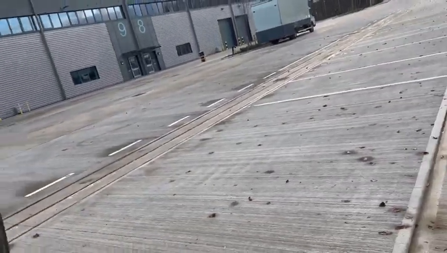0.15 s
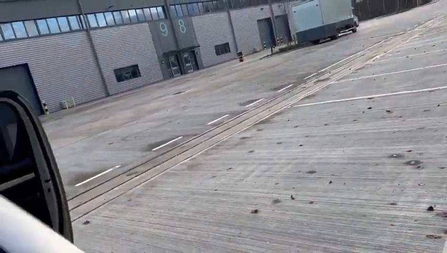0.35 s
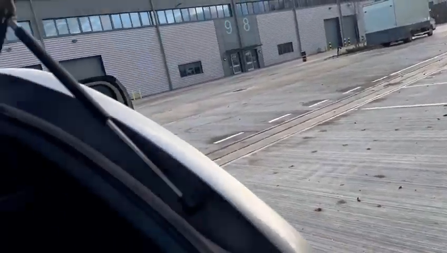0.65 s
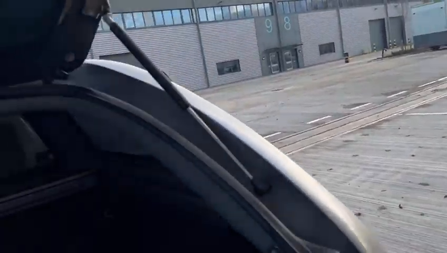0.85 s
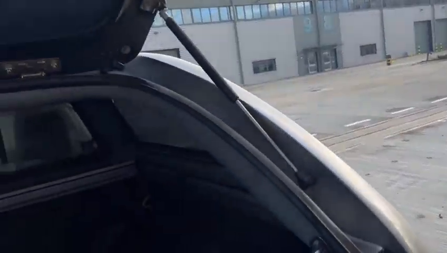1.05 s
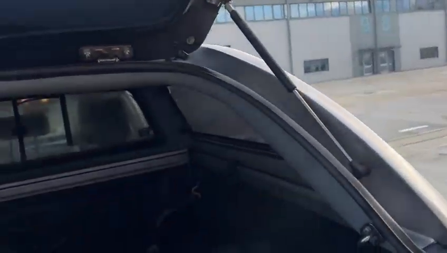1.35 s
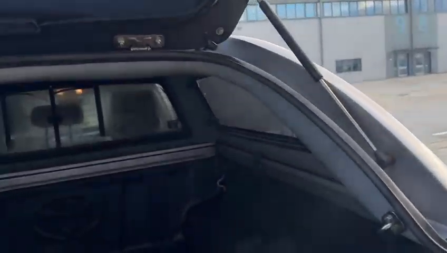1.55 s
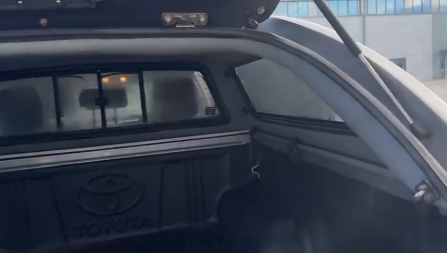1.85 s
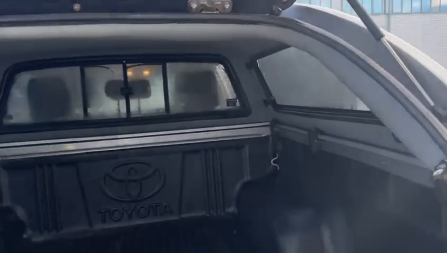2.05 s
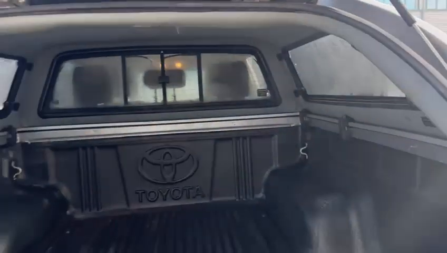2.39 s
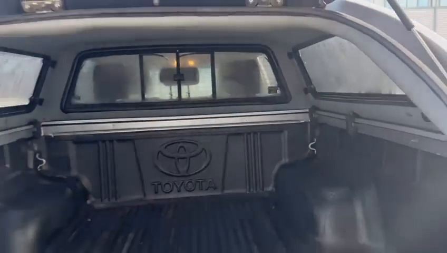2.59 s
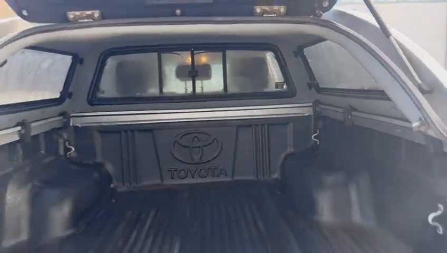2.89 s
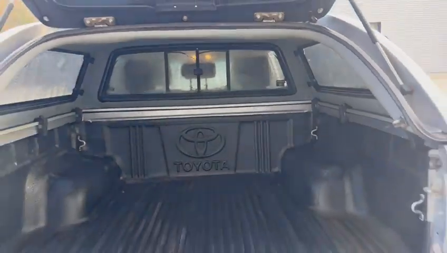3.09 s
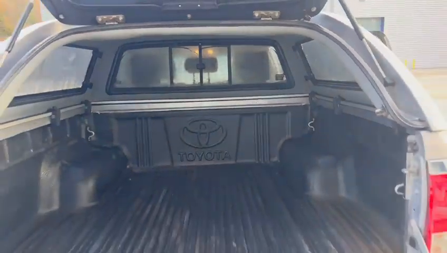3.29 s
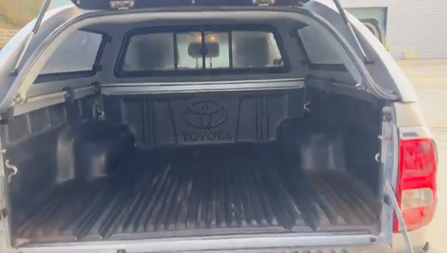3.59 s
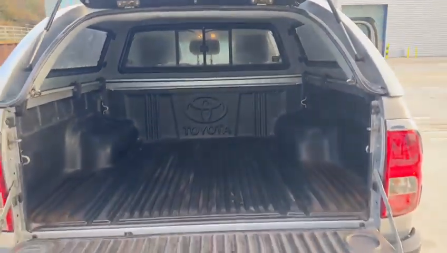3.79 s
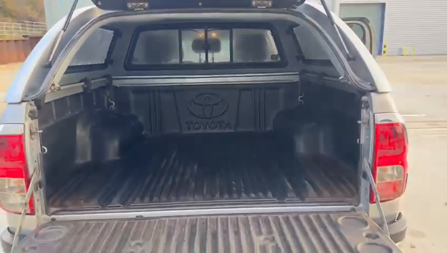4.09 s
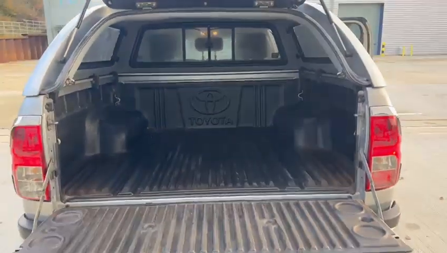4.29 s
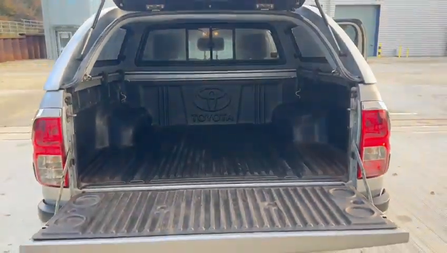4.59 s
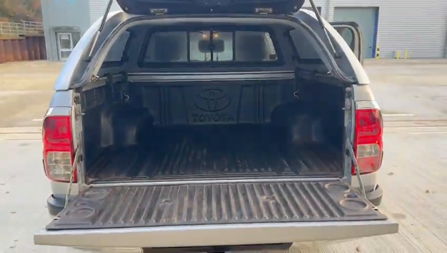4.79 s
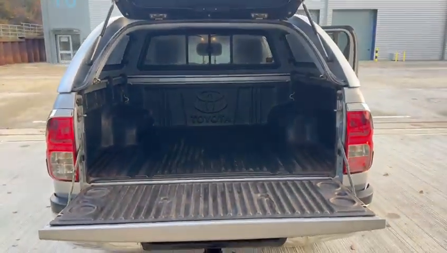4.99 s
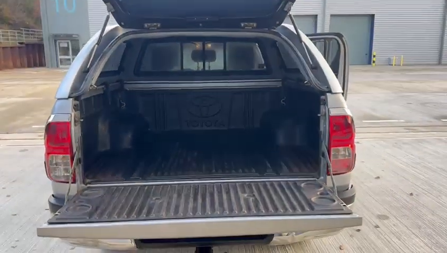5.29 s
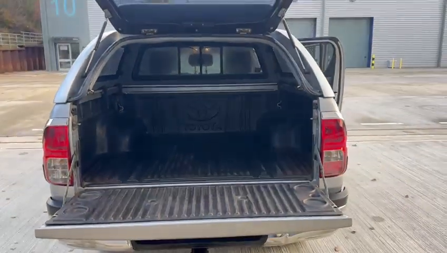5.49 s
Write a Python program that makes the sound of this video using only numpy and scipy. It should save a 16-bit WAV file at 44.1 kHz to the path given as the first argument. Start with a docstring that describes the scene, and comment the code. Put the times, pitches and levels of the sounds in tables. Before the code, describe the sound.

Over a low diesel idle, a latch snaps open, a hollow metal tailgate drops and bangs hard, rattling, followed by small foot scuffs.

```python
"""A pickup truck's tailgate is opened in a concrete yard; an idling diesel hums and clatters throughout (sines, noise).
Soft bumps (dull noise) come first; the handle clicks and the steel latch springs free (cracks, noise, sines).
The gate knocks, fittings tremble as it swings down, then it slams and rebounds: crack, dense ring, panel modes.
The bed booms (low sines) and shudders (noise), the stays snap taut, fittings tick (short noise rings).
Shoes scuff grit (noise swells), and one last bump follows. Two microphone ports hear it from close by."""
import sys
import numpy as np
from scipy import signal
from scipy.fft import rfft, irfft, next_fast_len
from scipy.io import wavfile

SR = 44100
rng = np.random.default_rng(int(sys.argv[2]) if len(sys.argv) > 2 else 0)


def master(y):
    """Save y as 16-bit WAV."""
    cut = np.clip(np.atleast_2d(y).T, -1, 1)
    pcm = np.round(cut * 32767)  # scale
    wavfile.write(sys.argv[1], SR, pcm.astype(np.int16))


N = 249184


def amp(db):
    """Decibels to gain."""
    return 10 ** (np.asarray(db) / 20)


def read(table, hz, axis=1):
    """One column of a table, interpolated on a log-frequency axis."""
    table = np.array(table, float)
    return np.interp(np.log(hz + 1), np.log(table[:, 0] + 1), table[:, axis])


def add(mix, start_s, sound):
    """Adds a sound to the mix at start_s, cut at the end of the mix."""
    part = mix[:, max(round(start_s * SR), 0):][:, :sound.shape[-1]]
    part += sound[..., :part.shape[1]]


def drift(rate_hz):
    """Random wander of unit rms: noise low-passed near rate_hz."""
    hz = np.fft.rfftfreq(N, 1 / SR)
    wander = irfft(rfft(rng.standard_normal(N)) * np.exp(-(hz / rate_hz) ** 2), N)
    return wander / wander.std()


def chatter(depth_db, rate_hz):
    """Loose contacts buzz: a gain that makes small irregular bursts."""
    return amp(depth_db * (drift(rate_hz) + 0.66))


def uneven_response(depth_db, count=260):
    """Random peaks and valleys of one object, shared by all its blows: rows (pitch_hz, level_db)."""
    hz = np.geomspace(800, 13000, count) - 750
    peaks = np.clip(rng.standard_normal(count), -2, 2) - .5
    return np.column_stack([hz, depth_db * peaks])


# microphone ports: pitch_hz, likeness (0-1), left_lead_rad, left_over_right_db
PORTS = [(60, 1, 0, .1), (200, .98, .06, .8), (450, .89, .27, 2.2), (800, .76, .65, 3.3),
         (1250, .66, 2, 1.2), (1800, .45, 5.5, -1.2), (2600, .55, 6.6, 0), (4000, .42, 6.6, 1),
         (6000, .74, 6.3, .8), (8500, .7, 5.9, -.8), (9200, .7, 5.9, -.5), (10300, .45, 3.4, -.3)]


def noise_pair(size):
    """Spectra of white noise at 0 dB per Hz, partly alike at the two ports."""
    hz = np.fft.rfftfreq(size, 1 / SR)
    a, b = rfft(rng.standard_normal((2, size))) * np.sqrt(SR / 2)
    alike = np.clip(read(PORTS, hz), 0, 1)
    common = a * np.sqrt((1 + alike) / 2)
    apart = b * np.sqrt((1 - alike) / 2)
    return hz, np.array([common + apart, common - apart])


def through_ports(near):
    """Near sounds reach the two ports with their own phase and balance."""
    size = next_fast_len(N + 8192)
    hz = np.fft.rfftfreq(size, 1 / SR)
    balance = amp(read(PORTS, hz, axis=3) / 2)
    right_lag = np.exp(-1j * read(PORTS, hz, axis=2))
    response = np.array([balance, right_lag / balance])
    return irfft(rfft(near, size) * response, size)[:, :N]


def dense_ring(table, colour_db, crack_db, crack_s, stretch, size=32768, count=12):
    """Countless close modes as noise bands, each dying at its own speed, topped by the contact crack."""
    hz, spectrum = noise_pair(size)
    t = np.arange(size) / SR
    spectrum = spectrum * amp(read(table, hz) + colour_db(np.maximum(hz, 60)))
    centres_hz = np.geomspace(40, 12000, count)
    out = np.zeros((2, size))
    for centre_hz, share in zip(centres_hz, np.eye(count)):
        weight = np.interp(np.log(hz + 1), np.log(centres_hz), share)
        band = irfft(spectrum * weight, size)
        t60_s = read(table, centre_hz, axis=2) * stretch
        ring = np.exp(-np.log(1000) * t / t60_s)
        crack = amp(crack_db) * np.exp(-t / crack_s) * centre_hz / (centre_hz + 600)
        rise = 1 - np.exp(-t / (0.00034 + 1 / centre_hz))  # bass needs a cycle to build
        out += band * (ring + crack) * rise
    return out


def modes(table, rise_s, scatter_db, size=65536):
    """Damped sines; every blow lands elsewhere and weights them a little differently."""
    t = np.arange(size) / SR
    out = np.zeros(size)
    for pitch_hz, level_db, t60_s in table:
        gain = amp(level_db + scatter_db * rng.standard_normal())
        out += gain * np.exp(-np.log(1000) * t / t60_s) * np.sin(2 * np.pi * pitch_hz * t)
    return out * (1 - np.exp(-t / rise_s))


# ring time factor of a full contact; crack that halves it; width of that change
FULL_RING, HALVING_CRACK_DB, HALVING_WIDTH_DB = 1.004, 15, 6.5


def ring_time(crack_db):
    """Ring time factor: a glancing, cracking contact rings briefly."""
    return FULL_RING / (1 + np.exp((crack_db - HALVING_CRACK_DB) / HALVING_WIDTH_DB))


# hum and whine of the idling engine: order (multiple of FIRING_HZ), level_db (rms, before swells)
ORDERS = [(2, -40.5), (3, -51.5), (4, -48), (5, -54.5), (6, -58), (9, -63.5), (27.5, -61.5), (37, -69.5),
          (38, -67.5), (45, -66.5), (51, -74), (52, -77), (54, -72)]
# engine clatter and open air: pitch_hz, density_db_per_hz
AIR = [(20, -78), (55, -65.5), (140, -74.5), (250, -77.5), (430, -83), (600, -79.5), (820, -84.5),
       (1250, -81.5), (1650, -90.5), (2500, -94.5), (4000, -96), (6300, -103.5), (8300, -103.5),
       (11500, -108)]
# level of the clatter and air noise, swelling with the slam's dying tail: time_s, level_db
NOISE_LEVEL = [(0, .5), (1.9, -0.2), (2.65, 2.5), (3.1, -1.3), (4.3, 0.9)]
FIRING_HZ = 25.08  # mean
# the hum swells while the microphones are beside the open bed
BED_FROM_S, BED_UNTIL_S, BED_CROSS_S = 1, 2.82, 0.12
HUM_DB, BED_EXTRA_DB = -1.36, 4.5


def engine():
    """Hum on the firing orders, belt and gear whine, and clatter and air noise pulsing at each firing."""
    t = np.arange(N) / SR
    arrive = np.tanh((t - BED_FROM_S) / BED_CROSS_S)
    leave = np.tanh((t - BED_UNTIL_S) / BED_CROSS_S)
    hum_db = HUM_DB + BED_EXTRA_DB * (arrive - leave) / 2
    noise_db = np.interp(t, *np.transpose(NOISE_LEVEL))
    firings = np.cumsum(FIRING_HZ * (1 + 0.003035 * drift(2.62))) / SR
    out = np.zeros((2, N))
    for order, level_db in ORDERS:
        wave = np.sqrt(2) * np.sin(2 * np.pi * (order * firings + rng.random()))
        if order < 10:
            out += wave * amp(level_db + hum_db + 0.55 * drift(5.3))
        else:  # the whine of the belts and gears comes and goes
            out += wave * amp(level_db + 2.7 * noise_db - 2.0 + 3.1 * drift(2.7))
    hz, spectrum = noise_pair(size=N)
    pulsing_db = 1.03 * np.cos(2 * np.pi * firings) + 0.4 * drift(22.8)
    return out + irfft(spectrum * amp(read(AIR, hz)), N) * amp(noise_db + pulsing_db)


# scuffs of shoes: centre_s, level_db, half_length_s (to 1/e), low_grind_db
SCUFFS = [(2.13, -48.5, 0.16, 17), (2.882, -53, 0.038, 17.5), (3.18, -44, 0.043, 1),
          (3.405, -48.5, .025, 1), (3.992, -50.5, 0.028, 9), (4.258, -47, 0.027, 12.5)]
# spectrum of grit and light metal: pitch_hz, density_db_per_hz, t60_s (metal only, before stretch)
TICK_RING = [(203, -47.5, 0.13), (1164, -45, 0.38), (2860, -50.5, 0.2), (5500, -52.5, 0.3),
             (8450, -48, 0.08), (12200, -45.5, 0.27)]


def scuffs():
    """Shoes grind grit on the concrete: buzzing noise that swells and fades."""
    t, out = np.arange(N) / SR, np.zeros((2, N))
    hz, spectrum = noise_pair(size=N)
    for centre_s, level_db, half_length_s, low_db in SCUFFS:
        grit = irfft(spectrum * amp(read(TICK_RING, hz) + low_db * np.exp(-hz / 4400)), N)
        out += grit * amp(level_db) * np.exp(-((t - centre_s) / half_length_s) ** 2)
    return out * chatter(depth_db=1, rate_hz=340)


# soft bumps of feet and hands: start_s, level_db, pitch_hz, length_s (twice the time to the peak)
BUMPS = [(.008, -28, 191, 0.02), (.355, -41.5, 330, .035), (.405, -35.5, 138, 0.04), (.52, -37, 121, 0.035),
         (.78, -37, 158, 0.073), (0.823, -33, 277, 0.009), (5.53, -34, 67, 0.017)]


def bumps():
    """Soft, dull pushes with no ring: low-passed noise under a smooth pulse."""
    out = np.zeros((2, N))
    for start_s, level_db, pitch_hz, length_s in BUMPS:
        hz, spectrum = noise_pair(size=16384)
        thud = irfft(spectrum / (1 + (1.8 * np.log2((hz + 1) / pitch_hz)) ** 4))
        u = 2 * np.arange(thud.shape[1]) / SR / length_s
        push = u * np.exp(1 - u)
        rms = np.sqrt(np.sum((thud[0] * push) ** 2) / np.sum(push ** 2))
        add(out, start_s, amp(level_db) * thud * push / rms)
    return out


def tick(level_db, low_db):
    """One light metal part touches another: a crack and a short dense ring."""
    colour_db = lambda hz: low_db * np.exp(-hz / 4400)
    return amp(level_db) * dense_ring(TICK_RING, colour_db, 14.0, 0.0019, 0.95, size=16384)


# single ticks of the stays and fittings: start_s, level_db, low_ring_db
TICKS = [(.15, -52.5, 19), (2.332, -39, 0), (2.545, -43, 4), (2.55, -39.5, 0), (2.664, -39, -6),
         (2.704, -50, -1), (2.859, -57.5, 21), (2.911, -52.5, 17)]
# trembling while the gate swings down and after it lands: start_s, end_s, level_db
RATTLES = [(1.802, 2.139, -54), (2.329, 2.56, -48.5)]
RATTLE_COUNT, RATTLE_SPREAD_DB, RATTLE_LOW_DB = 6, 2, -5.5  # count per rattle; spread is +/-


def fittings():
    """A few clear ticks, and faint irregular ticks of loose fittings in two spells."""
    out = np.zeros((2, N))
    for start_s, level_db, low_db in TICKS:
        add(out, start_s, tick(level_db, low_db))
    for start_s, end_s, level_db in RATTLES:
        slot_s = (end_s - start_s) / RATTLE_COUNT
        for i in range(RATTLE_COUNT):
            late, strength = rng.random(2)
            tick_db = level_db + RATTLE_SPREAD_DB * (2 * strength - 1)
            add(out, start_s + (i + late) * slot_s, tick(tick_db, RATTLE_LOW_DB))
    return out * chatter(depth_db=4.0, rate_hz=220)


# jerks of the stays: start_s, level_db
STAY_BLOWS = [(1.4025, -8), (2.2845, 0.5), (2.2915, -4.5), (2.303, -4.5), (2.411, -15)]
# dense ringing of the stays: pitch_hz, density_db_per_hz, t60_s (before stretch)
STAY_RING = [(150, -63, .2), (450, -71, 0.15), (716, -56, 0.25), (1090, -56, 0.25), (1400, -54.5, 0.2),
             (2160, -60, 0.19), (3180, -67.5, 0.25), (5030, -83, 0.23), (11500, -90, 0.15)]


def stays():
    """Steel stays jerk as the gate comes free, and snap taut with a crunch when it comes down again."""
    out, response = np.zeros((2, N)), uneven_response(depth_db=4.0)
    colour_db = lambda hz: read(response, hz)
    for start_s, level_db in STAY_BLOWS:
        ring = dense_ring(STAY_RING, colour_db, 5.6, 0.0042, 0.89, size=16384)
        add(out, start_s, amp(level_db) * ring)
    return out * chatter(depth_db=-1.5, rate_hz=400)


# blows in the latch: start_s, level_db, brightness_db_per_octave, crack_db (over the ring)
LATCH_BLOWS = [(0.7215, -11.5, -3, 3.5), (0.8731, -11, -8, 15), (.8822, 0, 1, -10), (.8915, -3, 1.4, -4),
               (0.9053, -2.5, -1.5, 1), (.921, -9.5, -2.5, 4)]
# dense ringing of the latch: pitch_hz, density_db_per_hz, t60_s (of a full contact)
LATCH_RING = [(40, -67, 0.5), (84.5, -43.5, 0.85), (139, -45.5, 0.64), (323, -48, 0.26), (800, -53, 0.33),
              (1170, -49.5, 0.24), (1650, -56, 0.27), (2060, -56.5, 0.37), (4200, -63.5, 0.3),
              (6730, -64, 0.33), (9000, -59.5, 0.22), (11600, -61.5, 0.23)]
# modes of the steel catches: pitch_hz, level_db, t60_s
STEEL_MODES = [(137.4, -21, 0.27), (165, -7, 0.18), (475, -29.5, 0.22), (695, -16, 0.12), (1070, -31, 0.27),
               (1167, -24, 0.22), (1897, -32, 0.14), (2050, -31, 0.23), (2213, -30, 0.18),
               (2810, -53, 0.103), (2817, -30.5, 0.12), (3225, -37, 0.31), (5560, -35, 0.16),
               (7680, -33, 0.22), (8200, -36, 0.28)]
STEEL_GROWTH = 1.7  # dB per dB of blow: the catches ring out only when struck hard


def latch():
    """The handle takes up slack, then the sprung steel catches let go in a quick cluster."""
    out, response = np.zeros((2, N)), uneven_response(depth_db=3.5)
    for start_s, level_db, tilt_db, crack_db in LATCH_BLOWS:
        colour_db = lambda hz: tilt_db * np.log2(np.maximum(hz, 190) / 1000) + read(response, hz)
        ring = dense_ring(LATCH_RING, colour_db, crack_db, 0.0068, ring_time(crack_db))
        steel = modes(STEEL_MODES, rise_s=0.0011, scatter_db=3.2)
        add(out, start_s, amp(level_db) * ring)
        add(out, start_s, amp(STEEL_GROWTH * level_db) * steel)
    return out * chatter(depth_db=1.0, rate_hz=270)


# dense ringing of the gate: pitch_hz, density_db_per_hz, t60_s (of a full contact)
GATE_RING = [(30, -59, 0.62), (80, -39.5, 0.73), (184, -38.5, 0.31), (410, -41.5, 0.38), (694, -46, 0.11),
             (1230, -49, 0.33), (1586, -56.5, 0.19), (2100, -62.5, 0.4), (4350, -68, 0.41),
             (7900, -75.5, 0.3), (11500, -78.5, 0.41)]
# modes of the gate panel: pitch_hz, level_db, t60_s
PANEL_MODES = [(101.7, -20, 0.63), (121.3, -21.5, 0.59), (127.6, -15.5, 0.56), (164.6, -16.5, 0.3),
               (226.3, -24, 0.48), (278.8, -28.5, 0.44), (323.4, -22, 0.35), (398, -23, 0.12),
               (487, -21.5, 0.26), (590, -19, 0.12), (702, -21, 0.11), (779, -29, 0.21)]
PANEL_DB, PANEL_LOSS = 3, 0.32  # modes against the blow; dB lost per dB of crack


def gate_blow(response, level_db, tilt_db, crack_db):
    """One contact: a crack, the dense ring of the gate and its panel modes."""
    colour_db = lambda hz: tilt_db * np.log2(hz / 1000) + read(response, hz)
    ring = dense_ring(GATE_RING, colour_db, crack_db, 0.0042, 1.005 * ring_time(crack_db))
    panel = modes(PANEL_MODES, rise_s=0.0044, scatter_db=0.57, size=32768)
    return amp(level_db) * (ring + amp(PANEL_DB - PANEL_LOSS * crack_db) * panel)


# blows on the gate: start_s, level_db, brightness_db_per_octave, crack_db (over the ring)
GATE_BLOWS = [(1.3647, -23.5, 3.5, 7), (1.3781, -21.5, 4.5, 1), (1.4012, -6, 0.4, 14), (2.1594, 4, -.5, 9),
              (2.1918, -3.5, 1.5, 3.5), (2.293, -5.5, -3.5, 10.5), (2.44, -19, 1, -7),
              (2.549, -26.5, -2.5, 1)]
# heaves of the truck bed on its springs: start_s, level_db
HEAVES = [(0.963, -11.5), (2.167, 1.5), (2.209, -5), (2.3143, -2), (2.354, -6.5), (2.48, -9.5)]
# modes of the bed: pitch_hz, level_db, t60_s
BED_MODES = [(29, -36.5, 1), (47.4, -6.5, 0.41), (66.4, -28, 0.22)]
# dense ringing of the shuddering bed: pitch_hz, density_db_per_hz, t60_s
SHUDDER_RING = [(30, -50, 1.4), (109, -48.5, 1.6), (236, -52.5, 2.04), (510, -55, 1.46), (870, -55.5, 1.01),
                (1950, -69, 1), (4500, -92, 2.4), (8100, -78.5, 0.51), (11400, -83, 1.05)]
# after each blow the gate seats on its other hinge, softer, with one fixed dull tone
SEAT_DELAY_S, SEAT_SOFTER_DB, SEAT_TILT_DB_PER_OCTAVE, SEAT_CRACK_DB = 0.03, -9, -3, -3.5


def gate():
    """The hollow gate knocks, slams and rebounds, hinge after hinge; the bed booms and shudders."""
    out, response = np.zeros((2, N)), uneven_response(depth_db=2.5)
    for start_s, level_db, tilt_db, crack_db in GATE_BLOWS:
        add(out, start_s, gate_blow(response, level_db, tilt_db, crack_db))
        seating = gate_blow(response, level_db + SEAT_SOFTER_DB, SEAT_TILT_DB_PER_OCTAVE, SEAT_CRACK_DB)
        add(out, start_s + SEAT_DELAY_S, seating)
    for start_s, level_db in HEAVES:
        add(out, start_s, amp(level_db) * modes(BED_MODES, rise_s=0.029, scatter_db=0.48))
    shudder = dense_ring(SHUDDER_RING, np.zeros_like, -20, .01, 1, size=65536)
    rise = 1 - np.exp(-np.arange(shudder.shape[1]) / SR / 0.012)
    add(out, 2.2, shudder * rise)
    return out


def scene():
    """The tailgate is right at the microphones; the engine comes from all round the truck."""
    near = scuffs() + bumps() + fittings() + stays() + latch() + gate()
    return through_ports(near) + engine() * amp([[.2], [-.2]])  # left, right dB


NOTCH_HZ, NOTCH_WIDTH_HZ, NOTCH_DB = 9544, 430, -35
EDGE_HZ = 11680


def record(dry):
    """Treble notch of the microphone, soft overload at the highest peaks, band limit."""
    hz = np.fft.rfftfreq(N, 1 / SR)
    notch_db = NOTCH_DB * np.exp(-((hz - NOTCH_HZ) / NOTCH_WIDTH_HZ) ** 2)
    heard = irfft(rfft(dry) * amp(notch_db), N)
    rounded = heard / (1 + heard ** 6) ** (1 / 6)
    edge = signal.firwin(301, EDGE_HZ, window=("kaiser", 9), fs=SR)
    return signal.oaconvolve(rounded, edge[None], "same")


dry = scene()
out = record(dry)
master(out)
```